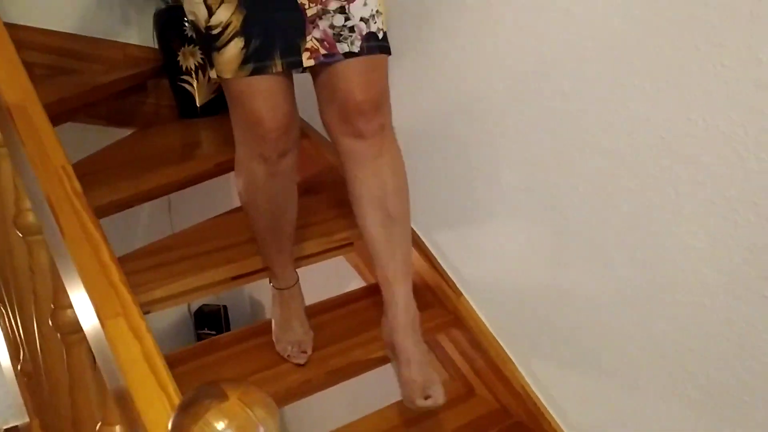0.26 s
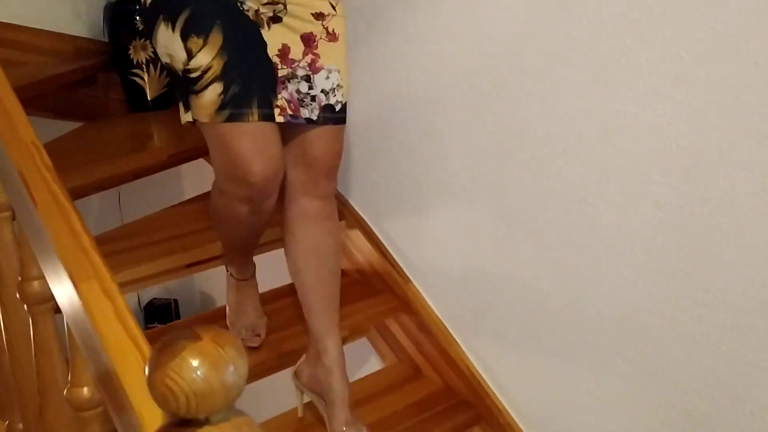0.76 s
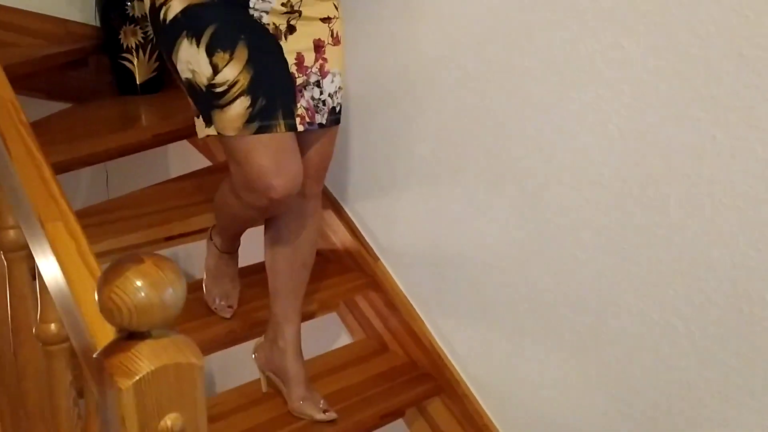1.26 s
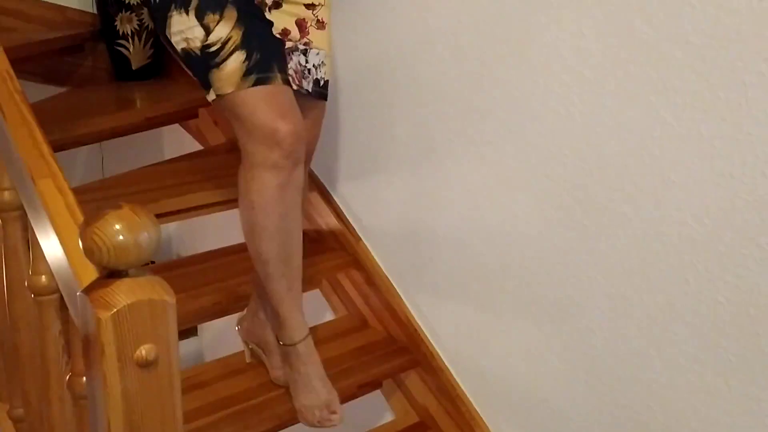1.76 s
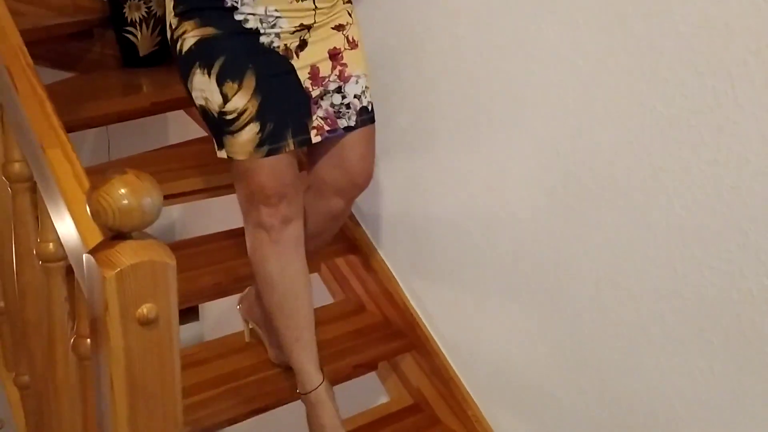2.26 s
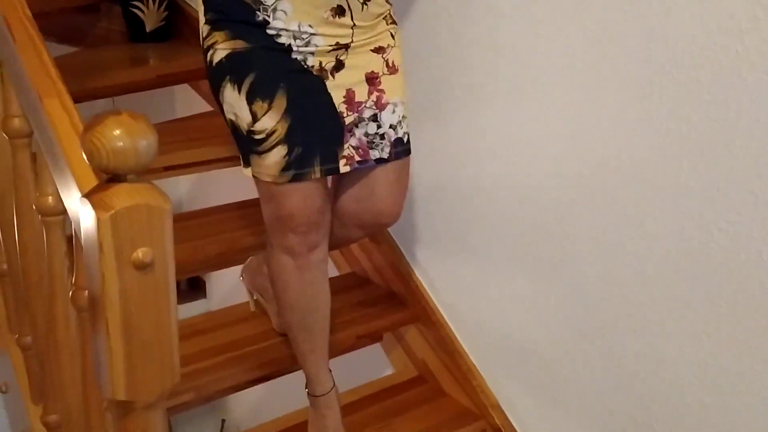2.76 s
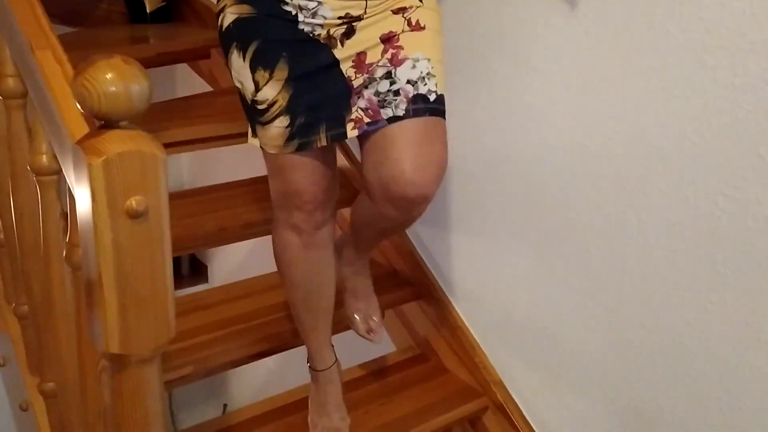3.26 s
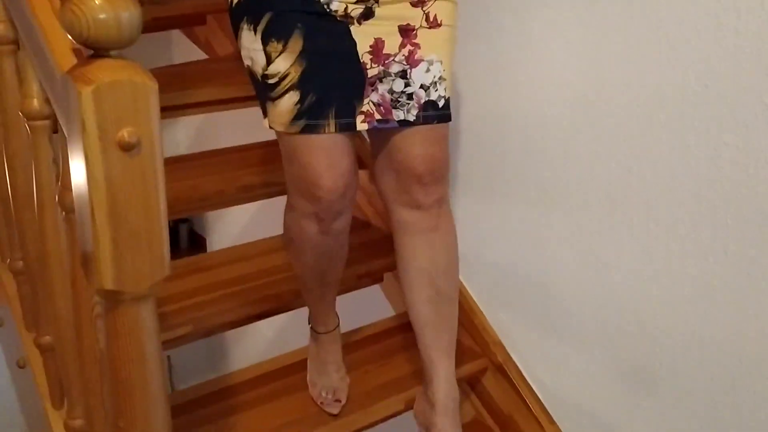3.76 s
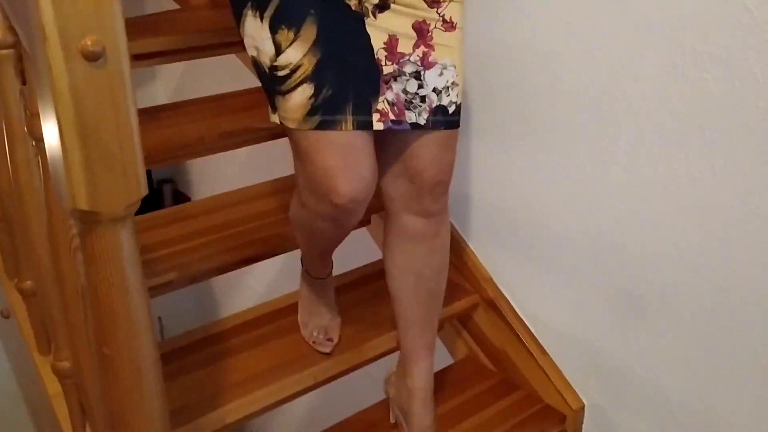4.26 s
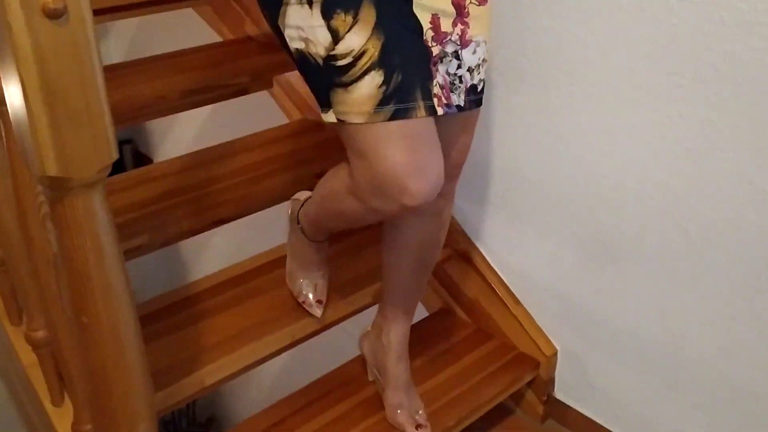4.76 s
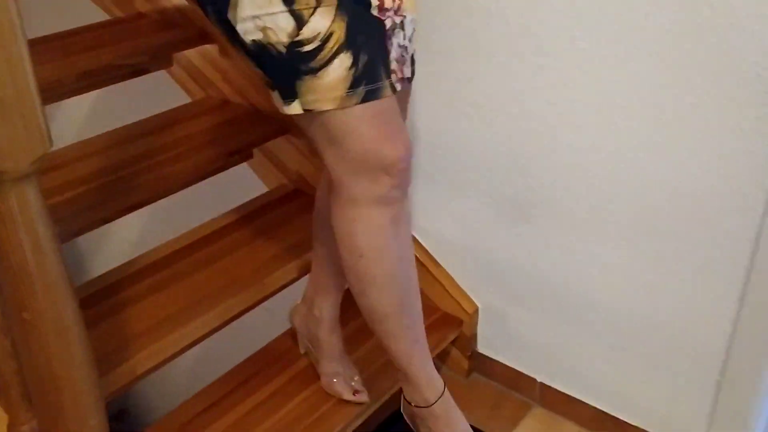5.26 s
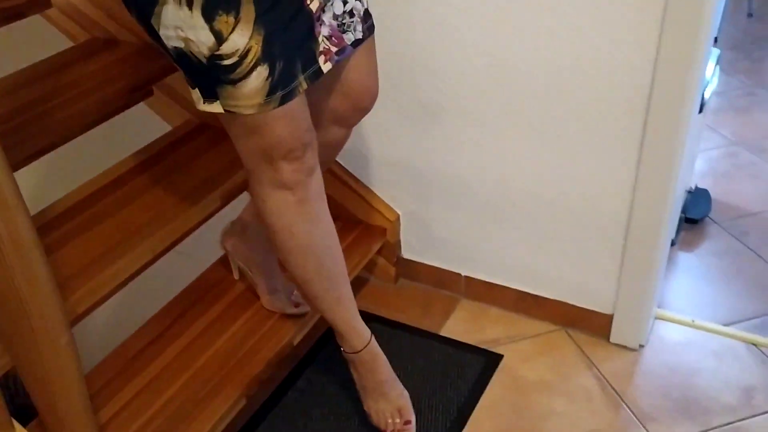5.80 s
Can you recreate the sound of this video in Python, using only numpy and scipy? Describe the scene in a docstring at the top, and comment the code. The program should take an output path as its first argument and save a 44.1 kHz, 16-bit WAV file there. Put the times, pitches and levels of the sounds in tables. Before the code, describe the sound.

A quiet indoor stairwell with faint air, wavering low hum and drifting rumble, heard by a handheld stereo camera. A small strap tick comes at 0.2 s, then soft dress rustle and a light heel touch at 0.74. The first step lands at 0.97 with a hard sole slap, followed at 1.03 by a hollow heel knock that rings the plank; bright ticks follow near 1.2. A sharp, deep handling pop hits the left side at 1.74. The second step slaps twice at 2.72, with softer heel taps around 2.85 and a light sole contact at 2.94. Straps tick around 4.0-4.2. The third step, brightest and loudest, slaps at 4.39 and knocks at 4.44, with a woody ring and short diffuse hall tail. A soft hollow sole rub comes at 5.17. From 5.3 to 5.95, finger rubs and small pops cluster at left, with another strap tick at 5.85.

```python
"""High-heeled sandals come slowly down an open wooden staircase in a hallway.
At each step the hard sole slaps the tread and rings plank and sandal; heel knocks ring the plank; the stairwell answers.
Straps tick, dress and shoes rustle, and the stairs give soft low booms; one turning sole rubs hollowly.
Fingers rub the camera, far left, and its handling pops mainly at the left microphone, over air, hum and rumble.
Impacts are coloured clicks and noise bursts, rings are decaying sines, and rubs and air are shaped noise."""
import sys
import numpy as np
from scipy import signal
from scipy.fft import rfft, irfft
from scipy.io import wavfile

SR = 44100
rng = np.random.default_rng(int(sys.argv[2]) if len(sys.argv) > 2 else 0)


def bounce(signal):
    """Save signal as a 16-bit WAV file at the path given by the first command-line argument."""
    frames = np.transpose(np.atleast_2d(signal))
    limited = np.clip(frames, -1, 1)
    pcm = np.round(limited * 32767).astype(np.int16)
    wavfile.write(sys.argv[1], SR, pcm)


N = 266011  # length of the scene in samples
T = np.arange(int(0.8 * SR)) / SR  # time axis of one short sound, s

# Ringing modes of the three planks, before any foot damps them: mode_hz, level_db, t60_s
PLANK_MODES = { "upper": [(152, -18, 0.36), (197.5, -16.5, 0.48), (227, 3.5, 0.062), (287.3, -25.5, 0.6),
               (309.8, -15, 0.54), (436.3, -9, 0.35), (447.7, -15.5, 0.39), (465, -20, 0.3),
               (530, -20.5, 0.45), (586, -22, 0.31), (630, -19, 0.16), (747, -9, 0.067), (847, -29, 0.61),
               (902, -18.5, 0.23), (968, -26, 0.53), (998, -30, 0.66), (1220, -27, 0.12),
               (1453, -37, 0.21)], "middle": [(141, -20, 0.42), (229.3, -10.5, 0.26), (295, 2, 0.041),
               (375, 1, 0.037), (428, -21.5, 0.99), (550.5, -19, 0.13), (597, -13, 0.12), (642, -6, 0.048),
               (776, -32, 0.33), (946, -30, 0.18)], "lower": [(137.9, -16.5, 0.22), (169, -1, 0.05),
               (210, -24, 0.59), (237.5, -12.5, 0.27), (263, -10.5, 0.1), (305.3, -17.5, 0.4),
               (355, -24, 0.59), (424.5, -15.5, 0.38), (437, -15, 0.39), (475, -4, 0.11), (506, -10, 0.16),
               (668, -15.5, 0.18), (739, -10.5, 0.073), (777, -9, 0.086), (822, -31, 0.18),
               (1110, -19.5, 0.16), (1420, -25, 0.14)]}
# Ringing modes of each stiff sandal: mode_hz, level_db, t60_s
SANDAL_MODES = {"left": [(1390, -12, 0.037), (1640, -16, .1), (2202, -3, 0.071), (2850, -10.5, 0.16),
                (3020, -10, .1), (4320, -12.5, .06), (5120, -9.5, .04), (6470, -11, 0.085),
                (8330, -13, 0.028)], "right": [(965, -5, 0.094), (1805, -15.5, 0.19), (2140, -17, 0.46),
                (2440, -15, 0.27), (2400, -13, 0.13), (2730, 0, 0.039), (3130, -11, 0.043),
                (4160, -6, 0.027), (4620, -23, 0.15), (6420, -12, 0.07)]}

# Sole landings: start_s, tread, foot, slap_db, treble_tilt_db_per_octave, flatness_0_to_1, plank_db, sandal_db
SOLE_LANDINGS = [(0.9741, "upper", "left", -15, -2, 0.6, -19.5, -44),
                 (2.724, "middle", "right", -12.5, -1, 0.64, -29, -41),
                 (2.7314, "middle", "right", -19.5, -1.5, .8, -33, -54),
                 (2.9357, "middle", "right", -23, -1.5, 0, -29.5, -66),
                 (4.386, "lower", "left", -9.5, -0.3, 0.9, -13, -40.5)]
# Heel landings: start_s, tread, knock_db, hardness (factor on knock frequencies),
# treble_tilt_db_per_octave, plank_db
HEEL_LANDINGS = [(0.742, "upper", -33, 0.78, -9, -47.5), (1.0313, "upper", -11, 0.94, -3, -23),
                 (2.8442, "middle", -24.5, 0.68, -2.5, -39.5), (2.8583, "middle", -28, 1.05, -3, -37),
                 (2.876, "middle", -31, 0.35, -1, -47), (4.099, "lower", -31, 0.39, 7, -50),
                 (4.4399, "lower", -7, 0.99, 3.5, -18.5)]
# Ticks as the foot flexes: start_s, level_db, dull_db (sole part, relative), pitch (factor on strap frequencies)
STRAP_TICKS = [(0.219, -37.5, -21, 0.67), (2.177, -45, 6.5, 1.3), (0.744, -40.5, 6, 0.76),
               (1.182, -31, -8, 1.35), (1.189, -29.5, -27, 1.6), (2.969, -45, 8.5, 0.76),
               (3.148, -47.5, 10, 1.1), (3.98, -32, 0, 0.86), (4.0965, -33, 3, 0.94),
               (4.207, -32, -5.5, 1.3), (4.606, -39, 2, 0.9), (4.69, -37.5, -0.5, 0.97),
               (5.845, -34, -1.5, 1.02)]
# Clearer rubs of dress and shoes, and, far left, of fingers on the camera:
# middle_s, length_s, level_db, left_minus_right_db
RUB_SWELLS = [(0.242, 0.054, -71, -9), (0.483, 0.17, -65, 1), (0.917, 0.11, -70, 2),
              (2.675, 0.11, -62.5, 2), (2.827, 0.32, -60, 1), (3.236, 0.049, -67.5, 19),
              (3.465, 0.058, -70, 15), (3.892, 0.1, -71, 6), (5.535, 0.075, -66.5, 14.5),
              (5.638, 0.015, -61, 21), (5.69, 0.098, -64, -2), (5.771, 0.14, -59, 2)]
# The dress against the legs: middle_s, length_s, centre_hz, level_db
DRESS_BRUSHES = [(0.383, 0.11, 1110, -69), (0.708, 0.16, 4480, -67.5), (3.707, 0.16, 3250, -71),
                 (4.352, .06, 2500, -65.5), (5.26, .2, 1390, -77)]
# Camera handling: start_s, click_db, upper_edge_hz, thump_db, thump_hz, finger_tick_db
HANDLING_POPS = [(0.965, -37, 3000, -30.5, 250, -33.5), (1.1828, -39.5, 4000, -29, 242, -33),
                 (1.366, -53, 1500, -39, 199, -62), (1.7405, -12, 5270, -21.5, 59.3, -41),
                 (1.776, -40, 900, -32, 250, -66), (2.588, -52, 1000, -35.5, 132, -68),
                 (3.875, -57, 1500, -37.5, 302, -45), (5.295, -39.5, 3000, -36, 254, -48),
                 (5.6445, -26.5, 2080, -26.5, 186, -29), (5.713, -62, 1500, -38, 205, -51),
                 (5.7896, -56, 1500, -33.5, 267, -41), (5.828, -36, 700, -31, 76.4, -42),
                 (5.8492, -59, 1980, -22, 890, -37), (5.8825, -58, 1500, -40, 235, -59),
                 (5.9364, -45, 1200, -30.5, 280, -38.5), (5.9459, -32.5, 1900, -34, 210, -40)]
# Weight shifting on the stairs: middle_s, length_s, pitch_hz, level_db
STAIR_BOOMS = [(0.928, .26, 38.4, -55), (1.134, 0.35, 53.4, -52.5), (2.809, 0.12, 69, -56),
               (4.561, 0.19, 57.3, -58), (5.537, 0.2384, 63.2, -55), (5.856, .14, 45.4, -58.5)]

# Spectrum of each foot's sole slap: frequency_hz, relative_level_db
SLAP_SPECTRA = {"left": [(40, -23), (140, 8.5), (330, -1), (620, -4.5), (950, 1), (1400, 2), (2000, -5.5),
                (2900, -2.5), (3600, -9), (5000, -4), (6000, -6.5), (7200, -6), (9800, -7), (13000, -15),
                (16000, -22)], "right": [(40, -4), (140, 6.5), (380, -8), (620, -1), (950, 1), (1200, -4),
                (1850, 0), (2650, -1), (3400, -7), (4200, -7), (6500, -6), (9500, -5.5), (13000, -13),
                (16000, -25)]}
# Spectrum of the heel knock at hardness 1: frequency_hz, relative_level_db
KNOCK_SPECTRUM = [(40, -22), (110, -9), (220, -4.5), (450, -3.5), (720, -0.5), (1000, -8.5), (1450, -8.5),
                  (1900, -19.5), (2500, -18.5), (3700, -34.5), (8000, -43), (16000, -62)]
# Spectrum of a strap tick at pitch 1: frequency_hz, relative_level_db
STRAP_SPECTRUM = [(100, 5), (1000, -4), (3000, -7), (5000, 1.5), (8000, 4.5), (10500, 1), (13000, -3),
                  (16000, -20)]
# Spectrum of the sole's duller part of a tick: frequency_hz, relative_level_db
DULL_SPECTRUM = [(60, -8), (250, 8.5), (500, 5.5), (1000, 8), (2200, 6.5), (4500, -1.5), (8000, -68),
                 (16000, -8)]
# Spectrum shared by the rubs of dress, shoes and fingers: frequency_hz, relative_level_db
RUB_SPECTRUM = [(100, -52), (1000, 0.5), (3000, -0.5), (5000, -0.5), (8500, 3), (12000, 0), (16000, -1.5)]
# Spectrum of the sole turning on the plank: frequency_hz, relative_level_db
HOLLOW_SPECTRUM = [(100, -23), (330, -17), (436, 6), (580, -8), (740, -5.5), (860, 4), (1080, -10),
                   (1360, -3.5), (1580, -19), (1830, -2), (2200, -20), (3000, -18), (16000, -22)]
# Spectrum of the air and hiss: frequency_hz, relative_level_db
AIR_SPECTRUM = [(24, -61), (40, -4.5), (69, -2), (91, -10), (199, -17.5), (372, -24.5), (422, -18.5),
                (556, -23), (630, -26.5), (1090, -25), (1210, -29), (2440, -26.5), (3470, -34),
                (10200, -36.5), (16000, -43.5)]
# Spectrum of the rumble: frequency_hz, relative_level_db
RUMBLE_SPECTRUM = [(15, -51), (26, -44), (36, -7), (50, -3.5), (85, -16.5), (120, -21.5), (250, -27.5),
                   (1000, -61)]

# Decay of the hall's diffuse tail: frequency_hz, t60_s
HALL_DECAY = [(100, 0.58), (260, 0.65), (700, 0.58), (1800, 0.46), (4800, 0.48), (9000, 0.39),
              (15000, 0.32)]
# Echoes off the side wall and the neighbouring treads: delay_s, level_db
FIRST_ECHOES = [(.0019, -6.5), (.0072, -7), (0.0118, -2)]
# Drifting pitch of the hum: time_s, pitch_hz
HUM_PITCH = [(2.0, 54.8), (3.1, 66.23), (5.3, 65.47), (5.9, 59.2)]
# How alike diffuse noise is at the two microphones: frequency_hz, correlation
MIC_LIKENESS = [(30, 0.95), (70, 0.25), (150, 0.64), (400, 0.69), (700, 0.69), (1200, 0.014), (2200, 0.013),
                (16000, 0)]
# Stereo lean of the air: frequency_hz, left_minus_right_db
AIR_LEAN = [(40, 0.5), (150, 1.5), (500, 1), (2000, 1), (6000, 1), (16000, 4)]
# Difference in colour between the microphones: frequency_hz, left_minus_right_db
MIC_COLOUR = [(900, -0.5), (1450, -1.5), (1900, -0.5), (2500, 5), (3500, -2), (6000, 0), (9000, -2),
              (16000, -0.5)]

# contacts and rings
GRIT_DB = 3  # gain per unit of random size among the tiny contacts
ROLL_S = 0.00088  # the sole meets the wood over this rise time
RISE_REF_HZ = 465  # a mode of this frequency swells in the stated rise time
SETTLE_S, SETTLE_DB = 0.26, -5  # settling weight chokes the ring: this extra loss by this time
RETURN_S, RETURN_DB = 0.0795, -14.5  # the ring comes back once from the top of the stairwell
TICK_S, TICK_RISE_S, TICK_WET_DB = 0.014, 0.00077, 5.5
PIVOT_AT_S, PIVOT_DB = 5.172, -27

# friction
RUSTLE_DB, RUSTLE_WANDER_DB, RUSTLE_PER_S = -77, 6.5, 2.7  # the dress's faint rustle comes and goes at random
SCUFF_DB, SCUFF_PER_S = 2.5, 38  # rubbing catches and slips

# handling
POP_CLICK_S, POP_LEAD_S = 0.00039, 0.0014  # decay of the spike; the finger ticks just before it
THUMP_MIN_S, THUMP_RING_S, THUMP_REF_HZ = 0.0027, 0.007, 217  # deep thumps ring longer

# background and band limits
AIR_DB, AIR_WANDER_DB, AIR_PER_S = -62.5, 0.46, 2.48
HUM_DB, HUM_WIDTH_HZ = -67, 15
RUMBLE_DB, RUMBLE_WANDER_DB, RUMBLE_PER_S = -70, 4.5, 2.09
LOW_CUT_HZ, EDGE_HZ = 42, 15950
MIC_GRID_HZ = np.linspace(0, SR / 2, 129)


def amp(db):
    """Decibels to gain."""
    return 10 ** (np.asarray(db) / 20)


def unit(x):
    """Scales to rms 1."""
    return x / np.sqrt(np.mean(x ** 2) + 1e-30)


def read(points, hz):
    """A table's value on a log-frequency axis."""
    f, value = np.transpose(points)
    return np.interp(np.log(hz + 1), np.log(f + 1), value)


def sides(db):
    """Left and right gains for a level difference, positive to the left."""
    return amp(np.array([[db], [-db]]) / 2)


def add(mix, s, sound):
    """Lays a stereo sound into the mix at time s."""
    part = mix[:, max(round(s * SR), 0):][:, :sound.shape[-1]]
    part += sound[..., :part.shape[1]]


def wander(per_s, count=24):
    """A random drift of rms 1: sines of random phase up to the given rate."""
    t = np.arange(0, N, 256) / SR
    rates = per_s * np.geomspace(0.1, 1, count)[:, None]
    phases = rng.random((count, 1))
    drift = unit(np.sin(2 * np.pi * (rates * t + phases)).sum(0))
    return np.interp(np.arange(N) / SR, t, drift)


def diffuse(count):
    """White noise at two close microphones: most alike in the bass, unrelated at the top."""
    mid, side = rfft(rng.standard_normal((2, count)))
    same = np.clip(read(MIC_LIKENESS, np.fft.rfftfreq(count, 1 / SR)), -1, 1)
    mid = mid * np.sqrt((1 + same) / 2)
    side = side * np.sqrt((1 - same) / 2)
    return irfft([mid + side, mid - side], count)


def click(spectrum, tilt_db=0, size=4096):
    """A causal click of energy 1 with the given spectrum, energy packed to the front (minimum phase)."""
    hz = abs(np.fft.fftfreq(size, 1 / SR))
    log_gain = np.log(amp(read(spectrum, hz) + tilt_db * np.log2(1 + hz / 1000)))
    wave = np.fft.ifft(np.exp(np.conj(signal.hilbert(log_gain)))).real[:size // 2]
    return wave / np.linalg.norm(wave)


def scatter(t60, rise_s):
    """A brief cluster of tiny contacts of uneven size, energy 1 a channel."""
    sizes = np.minimum(rng.exponential(1, len(T)), 3)
    sizes = np.repeat(sizes, 32)[:len(T)]  # each size holds for 32 samples
    burst = diffuse(len(T)) * amp(GRIT_DB * sizes - 60 * T / t60) * (1 - np.exp(-T / rise_s))
    return burst / np.linalg.norm(burst, axis=1, keepdims=True)


def hall_tail(build_s):
    """A diffuse tail of energy 1 that builds up and dies band by band."""
    hz, t, bands = signal.stft(diffuse(len(T)), SR, nperseg=512)
    decay = amp(-60 * t / read(HALL_DECAY, hz)[:, None])
    tail = signal.istft(bands * decay, SR)[1][:, :len(T)]
    return unit(tail * (1 - np.exp(-T / build_s))) / np.sqrt(len(T))


def contact(spectrum, length_s, rise_s, sharpness, wet_db, tilt_db=0):
    """A click with first echoes, a cluster of tiny contacts and the hall's tail, all in one colour."""
    share = np.clip(sharpness, 0, 1)  # energy in the click against the cluster
    hits = np.sqrt(1 - share) * scatter(length_s, rise_s)
    hits += amp(wet_db) * hall_tail(build_s=0.0038)
    hits[:, 0] += np.sqrt(share)
    for delay_s, db in FIRST_ECHOES:
        hits[:, round(delay_s * SR)] += np.sqrt(share) * amp(db)
    return signal.fftconvolve(hits, click(spectrum, tilt_db)[None], axes=1)[:, :len(T)]


def ring(modes, rise_s, damping=1):
    """Dying modes, the high ones swelling first, close pairs beating; a resting foot damps them."""
    wave = np.zeros(len(T))
    for hz, db, t60 in modes:
        swell = 1 - np.exp(-(T * hz / (rise_s * RISE_REF_HZ)) ** 2)
        wave += amp(db - 60 * damping * T / t60) * swell * np.sin(2 * np.pi * hz * T)
    choke = amp(SETTLE_DB * (T / SETTLE_S) ** 2)
    return np.tile(wave * choke, (2, 1))


def stairwell(sound, wet_db, build_s):
    """A ringing sound plus its late return and its diffuse tail."""
    out = sound + amp(wet_db) * signal.fftconvolve(sound, hall_tail(build_s), axes=1)[:, :len(T)]
    add(out, RETURN_S, amp(RETURN_DB) * sound)
    return out


def steady_air(hz):
    """Air and hiss: shaped diffuse noise whose level drifts very slightly."""
    lean = amp(np.outer([1, -1], read(AIR_LEAN, hz)) / 2)
    air = unit(irfft(rfft(diffuse(N)) * amp(read(AIR_SPECTRUM, hz)) * lean, N))
    return amp(AIR_DB + AIR_WANDER_DB * wander(AIR_PER_S)) * air


def low_hum(hz):
    """A wavering hum: a narrow band of noise shifted up to a drifting pitch."""
    pitch_hz = np.interp(np.arange(N) / SR, *np.transpose(HUM_PITCH))
    waver = signal.hilbert(irfft(rfft(diffuse(N)) * np.exp(-(hz / HUM_WIDTH_HZ) ** 2), N))
    # half a width lower, since the noise band lies above the shift
    shift = np.exp(2j * np.pi * np.cumsum(pitch_hz - HUM_WIDTH_HZ / 2) / SR)
    return amp(HUM_DB) * unit((waver * shift).real) * sides(5.0)


def low_rumble(hz):
    """Deep shaped noise that drifts in level."""
    rumble = unit(irfft(rfft(diffuse(N)) * amp(read(RUMBLE_SPECTRUM, hz)), N))
    swell = amp(RUMBLE_DB + RUMBLE_WANDER_DB * wander(RUMBLE_PER_S))
    return swell * rumble * sides(3)


def background():
    """Three independent noise beds: air, hum and rumble."""
    hz = np.fft.rfftfreq(N, 1 / SR)
    return steady_air(hz) + low_hum(hz) + low_rumble(hz)


def rubs(grain_db=3, wet_db=-6):
    """Fine friction grains: a faint rustle throughout and soft swells, lightly answered by the hall."""
    pressure = amp(RUSTLE_DB + RUSTLE_WANDER_DB * wander(RUSTLE_PER_S)) * np.ones((2, 1))
    for s, length_s, db, pan_db in RUB_SWELLS:
        swell = np.hanning(int(length_s * SR))
        add(pressure, s - length_s / 2, amp(db) * sides(pan_db) * swell)
    pressure *= amp(SCUFF_DB * wander(SCUFF_PER_S))
    grain_sizes = np.minimum(rng.exponential(1, N), 4)
    grains = unit(rng.standard_normal((2, N)) * amp(grain_db * grain_sizes))
    out = pressure * grains
    out += amp(wet_db) * signal.fftconvolve(out, hall_tail(build_s=0.0018), axes=1)[:, :N]
    return signal.fftconvolve(out, click(RUB_SPECTRUM)[None], axes=1)[:, :N]


def ticks(pan_db=1.0):
    """Bright ticks of the plastic straps, with a duller part from the sole."""
    out = np.zeros((2, N))
    for s, db, dull_db, pitch in STRAP_TICKS:
        colour = np.array(STRAP_SPECTRUM) * [pitch, 1]
        bright = contact(colour, TICK_S, TICK_RISE_S, sharpness=0.11, wet_db=TICK_WET_DB)
        dull = contact(DULL_SPECTRUM, TICK_S, TICK_RISE_S, sharpness=0.063, wet_db=2.0)
        add(out, s, amp(db) * sides(pan_db) * (bright + amp(dull_db) * dull))
    return out


def brushes(width_octaves=1.0):
    """The dress brushes the legs: a soft swish of band-limited noise."""
    out, hz = np.zeros((2, N)), np.fft.rfftfreq(len(T), 1 / SR)
    for s, length_s, centre_hz, db in DRESS_BRUSHES:
        octaves = np.log2((hz + 1) / centre_hz)
        band = np.exp(-(octaves / width_octaves) ** 2 / 2)
        cloth = unit(irfft(rfft(diffuse(len(T))) * band, len(T)))
        swell = np.hanning(min(int(length_s * SR), len(T)))
        add(out, s - length_s / 2, amp(db) * swell * cloth[:, :len(swell)])
    return out


def heels():
    """The heel comes down with the body's weight: a dull knock and the full ring of the plank."""
    out = np.zeros((2, N))
    for s, tread, knock_db, hardness, tilt_db, plank_db in HEEL_LANDINGS:
        colour = np.array(KNOCK_SPECTRUM) * [hardness, 1]  # a harder landing reaches higher
        knock = contact(colour, length_s=0.047, rise_s=0.00124, sharpness=0.27, wet_db=1, tilt_db=tilt_db)
        wood = stairwell(ring(PLANK_MODES[tread], rise_s=0.003), wet_db=-16.5, build_s=0.017)
        add(out, s, amp(knock_db) * knock + amp(plank_db) * wood)
    return out


def booms(pan_db=6):
    """Low tones that swell and fade as the staircase takes the weight."""
    out = np.zeros((2, N))
    for s, length_s, hz, db in STAIR_BOOMS:
        t = np.arange(int(length_s * SR)) / SR
        tone = unit(np.sin(2 * np.pi * (hz * t + rng.random())))
        add(out, s - length_s / 2, amp(db) * sides(pan_db) * tone * np.hanning(len(t)))
    return out


def pops(leak_db=-32, tick_pan_db=13):
    """A finger ticks on the camera; a pressure spike hits the left microphone and swings back, damped."""
    out = np.zeros((2, N))
    for s, click_db, soft_hz, thump_db, hz, tick_db in HANDLING_POPS:
        t60 = THUMP_MIN_S + THUMP_RING_S * (THUMP_REF_HZ / hz) ** 2
        spike = amp(click_db) * np.exp(-T / POP_CLICK_S)
        swing = amp(thump_db - 60 * T / t60) * np.sin(2 * np.pi * hz * T)
        soften = signal.butter(3, min(soft_hz, SR / 3), fs=SR, output="sos")
        pressure = signal.sosfilt(soften, spike - swing)
        add(out, s, np.outer([1, amp(leak_db)], pressure))  # only a trace reaches the right
        tick = contact(STRAP_SPECTRUM, length_s=0.0026, rise_s=0.00043, sharpness=0.023, wet_db=-9.5)
        add(out, s - POP_LEAD_S, amp(tick_db) * sides(tick_pan_db) * tick)
    return out


def soles():
    """The hard sole slaps the wood; the sandal's ring swells quickly, the plank's more slowly."""
    out = np.zeros((2, N))
    for s, tread, foot, slap_db, tilt_db, flat, plank_db, sandal_db in SOLE_LANDINGS:
        length_s = 0.091 * np.exp(-1.7 * flat)  # a flat landing is over sooner than a rolling one
        slap = contact(SLAP_SPECTRA[foot], length_s, ROLL_S, sharpness=0.15 * flat, wet_db=1.0, tilt_db=tilt_db)
        plank = amp(plank_db) * ring(PLANK_MODES[tread], rise_s=0.009, damping=5.94)
        shoe = amp(sandal_db) * ring(SANDAL_MODES[foot], rise_s=0.0024) * sides(3.5)
        ringing = stairwell(plank + shoe, wet_db=-8, build_s=0.025)
        add(out, s, (amp(slap_db) * slap + ringing) * sides(1.0))
    return out


def pivot():
    """The loaded sole turns a little on the plank: a soft, hollow rub."""
    out = np.zeros((2, N))
    rub = contact(HOLLOW_SPECTRUM, length_s=0.48, rise_s=0.0022, sharpness=0.047, wet_db=-10.0)
    add(out, PIVOT_AT_S, amp(PIVOT_DB) * rub)
    return out


def scene():
    """Steps, small shoe sounds, rubs, handling and the hallway."""
    shoes = heels() + soles() + pivot() + ticks()
    friction = rubs() + brushes()
    return background() + friction + shoes + booms() + pops()


def record(dry):
    """A low cut, two microphones that differ in colour, then a steep upper band limit."""
    low_cut = signal.butter(2, LOW_CUT_HZ, "highpass", fs=SR, output="sos")
    dry = signal.sosfilt(low_cut, dry)
    heard = []
    for channel, sign in zip(dry, (1, -1)):
        gain = amp(sign * read(MIC_COLOUR, MIC_GRID_HZ) / 2)
        colour = signal.firwin2(257, MIC_GRID_HZ, gain, fs=SR)
        heard.append(signal.fftconvolve(channel, colour, "same"))
    band_limit = signal.firwin(511, EDGE_HZ, window=("kaiser", 9), fs=SR)
    return signal.oaconvolve(np.array(heard), band_limit[None], "same")


dry = scene()
out = record(dry)
bounce(out)
```